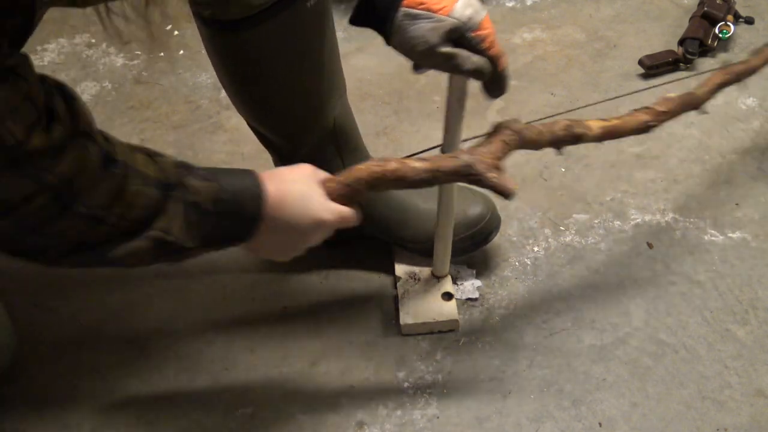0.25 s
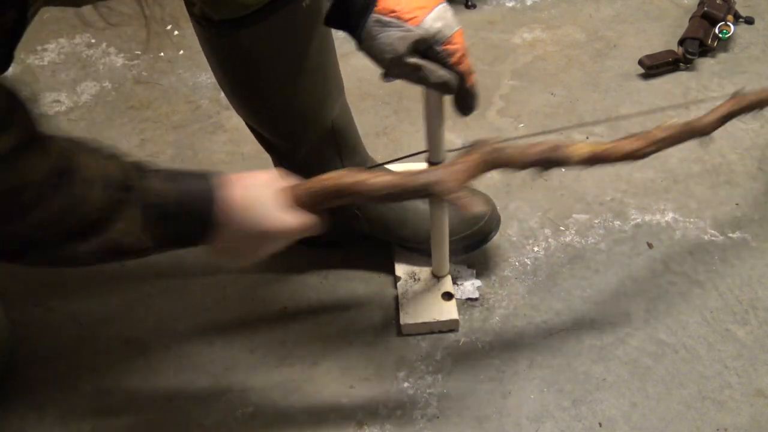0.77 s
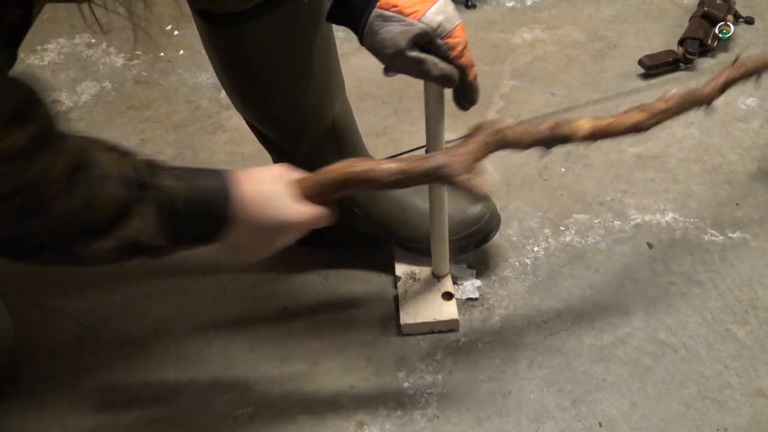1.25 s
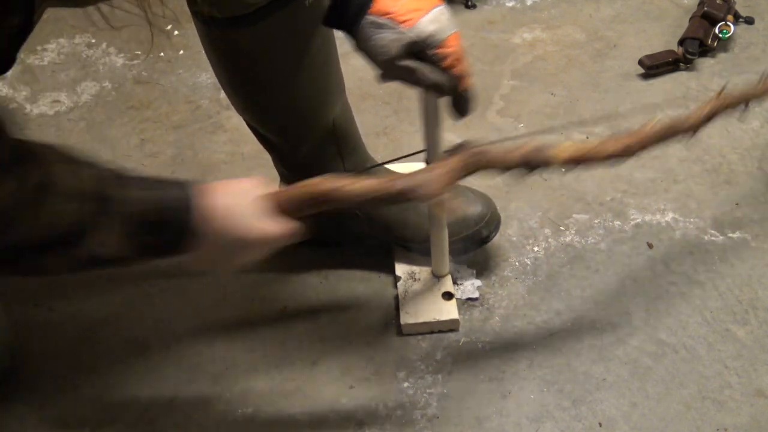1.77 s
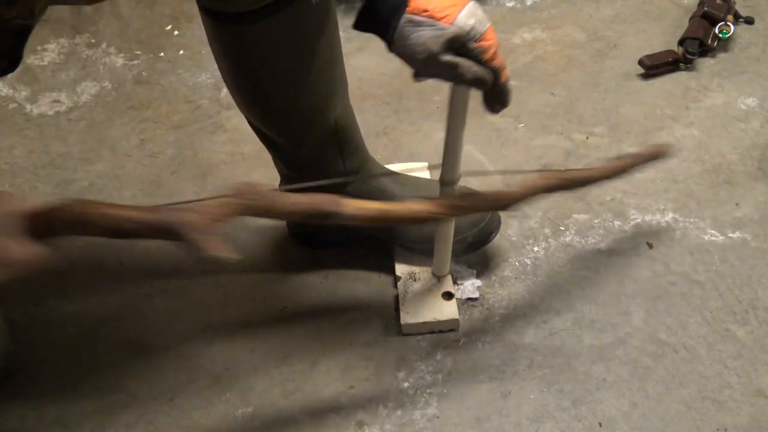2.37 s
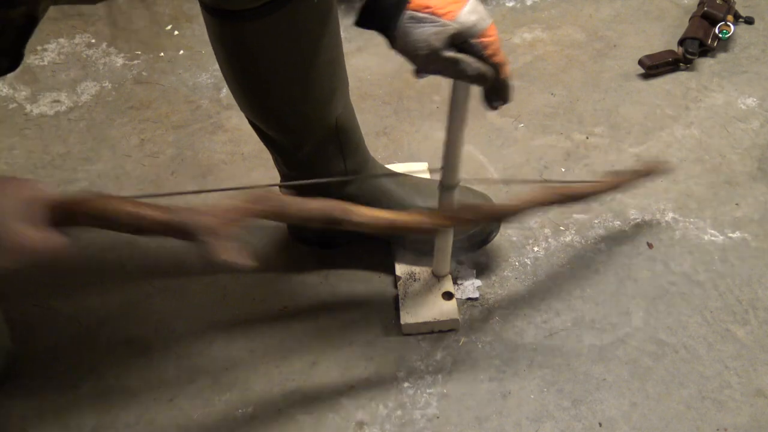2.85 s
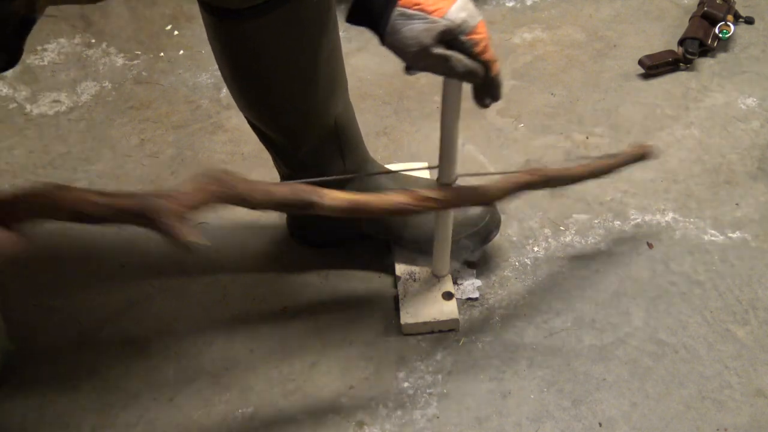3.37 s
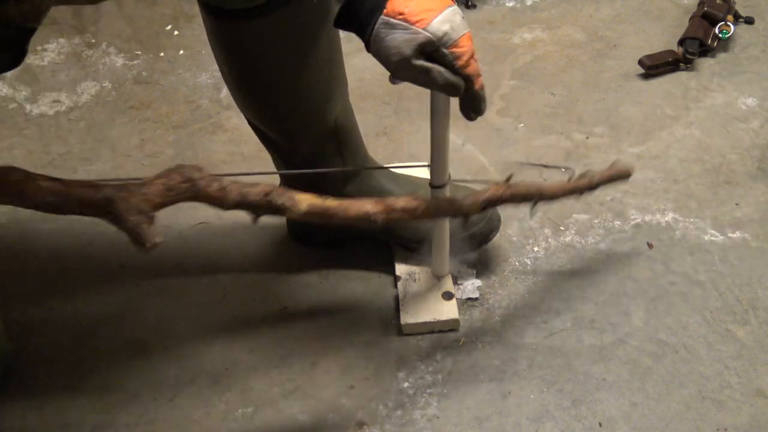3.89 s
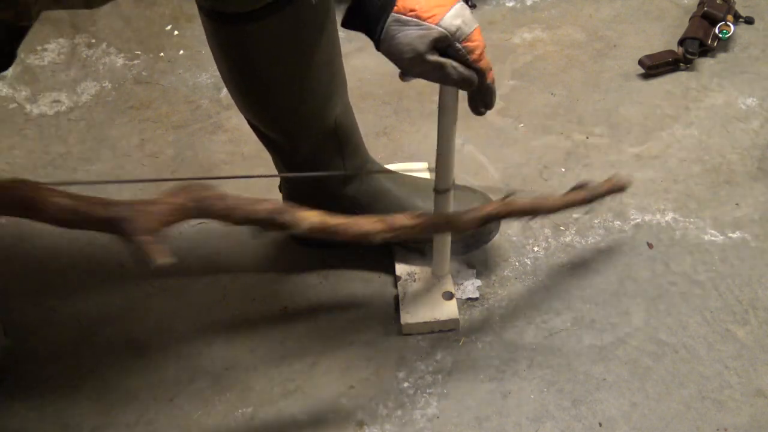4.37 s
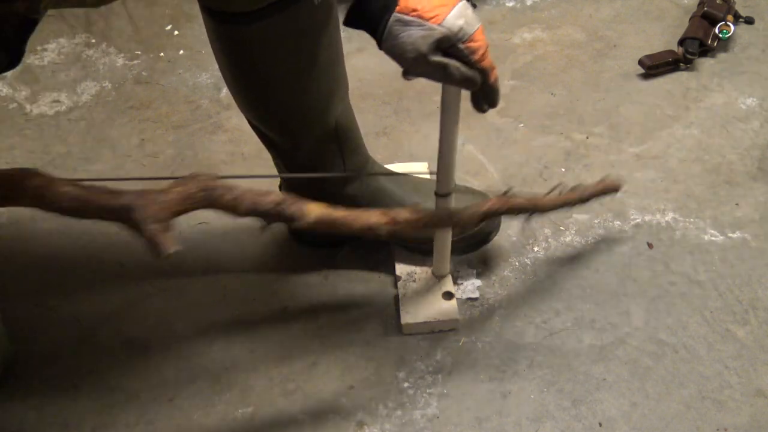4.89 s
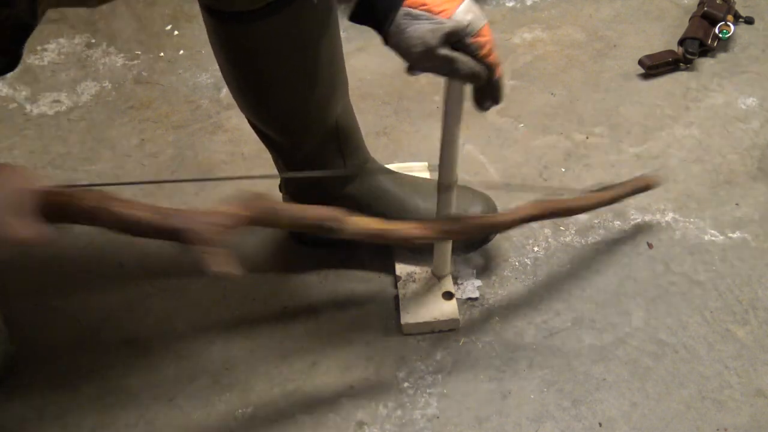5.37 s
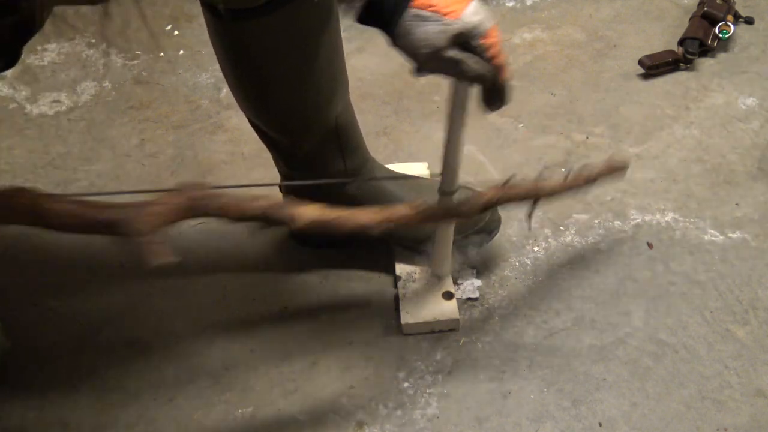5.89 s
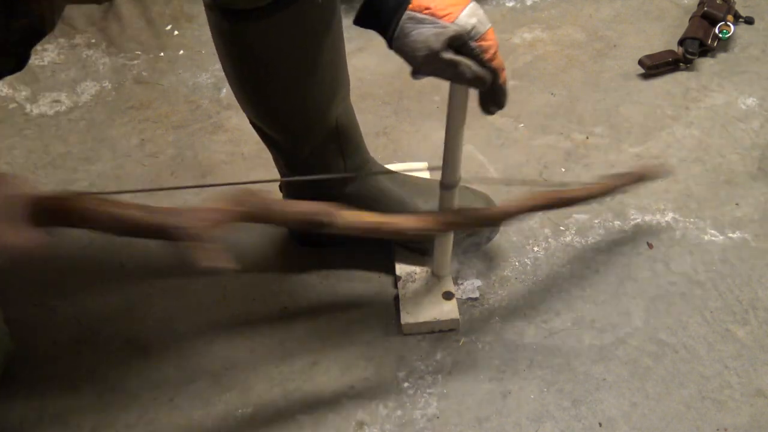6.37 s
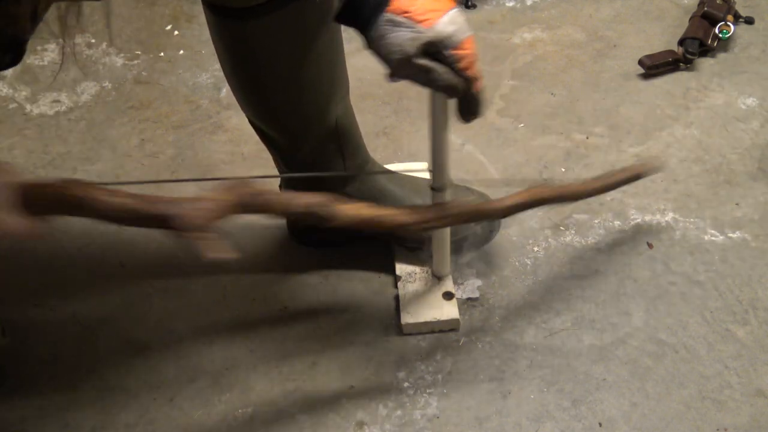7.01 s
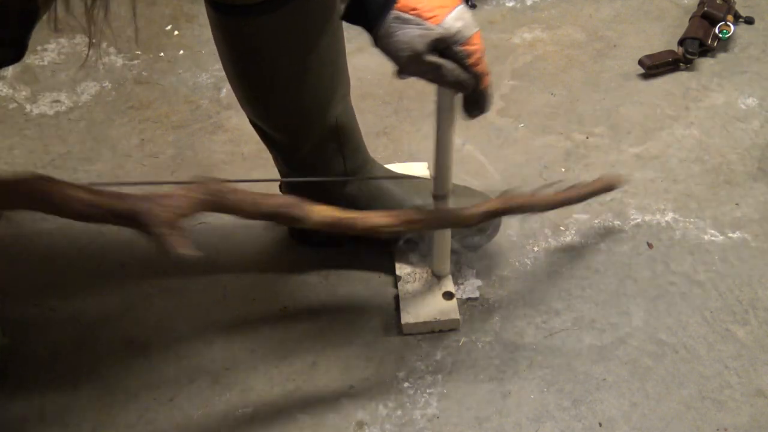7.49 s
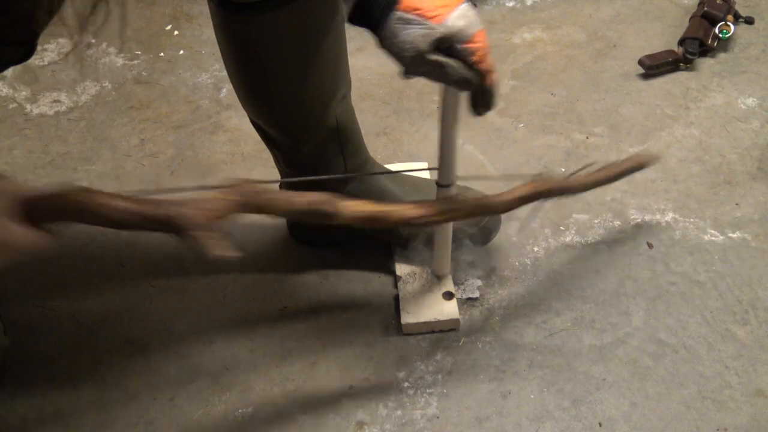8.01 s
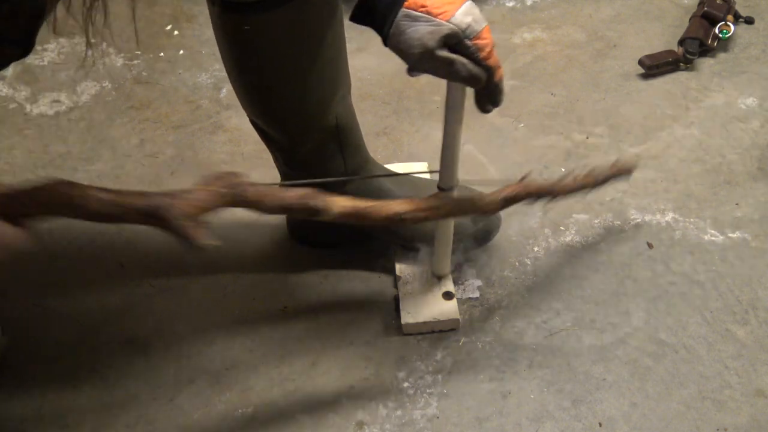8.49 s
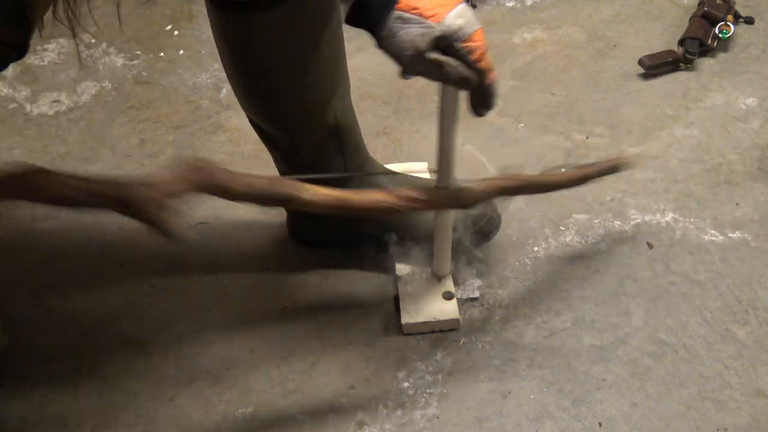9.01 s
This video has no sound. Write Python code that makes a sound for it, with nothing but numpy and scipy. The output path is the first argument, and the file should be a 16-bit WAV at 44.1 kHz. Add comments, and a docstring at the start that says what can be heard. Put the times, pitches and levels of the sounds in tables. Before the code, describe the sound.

A bow drill runs at a steady pace, about two round trips a second, heard close in stereo in a bare, hard room. From 0 to 2 s, high whistling chirps near 2.9 kHz on the pulls alternate with bright, nasal squeals near 1 kHz on the pushes from about 0.7 s, each about a tenth of a second and ringing for under half a second. Around 2.7 s the push gives only a weak, pure squeak. From 3 s the squeals return louder, while the pulls become mostly dry, gritty rasping with high hiss, strongest near 4 s, when a soft falling swish passes. The squeal at 5.7 s is weak; from 6.2 s they are loud and hoarse again, with heavier rasping toward 8.4 s and a longer, lower, rough squeal near 9.2 s. Small board thumps accompany the grabs; sparse faint ticks.

```python
"""Bow drill squealing in a bare room

A bow spins a wooden spindle in a hearth board on a concrete floor, about two round trips a second.
On most pushes the tip sticks and slips in a loud squeal, made of a wandering tone and its overtones.
The pull whistles at first, then mostly rasps (shaped noise) as dust builds up.
A dense noise tail makes the room ring after each squeal, and a limiter holds the peaks down."""
import sys
import numpy as np
from scipy import signal
from scipy.fft import rfft, irfft, next_fast_len
from scipy.io import wavfile
from scipy.ndimage import uniform_filter1d, minimum_filter1d, map_coordinates

SR = 44100
rng = np.random.default_rng(int(sys.argv[2]) if len(sys.argv) > 2 else 0)


def wrap_up_sound(samples):
    """Save the sound to the file named by the first command line argument, as 16-bit audio."""
    columns = np.atleast_2d(samples).T
    # keep every value between -1 and 1, then stretch to whole-number steps
    tamed = np.clip(columns, -1, 1)
    steps = np.round(tamed * 32767).astype(np.int16)
    wavfile.write(sys.argv[1], SR, steps)


N = 407925  # length in samples

# Levels in the tables and settings are relative: grip, friction and the final mix act on top of them.
# stick-slip squeals on the pushes:
# (grab t/s, length/s, f/Hz, level/dB, grip = octave over fundamental/dB, roughness 0-1)
SQUEALS = [(0.712, 0.079, 1045, -15.5, 4, 0.21), (1.19, 0.091, 1065, -15.5, 3.3, .46),
           (1.7, .072, 1084, -15.5, 3.5, 0.66), (2.184, .095, 1069, -16, 3.3, .34),
           (2.712, .042, 1182, -23, -21, 0.24), (3.183, 0.083, 1110, -12, 1, 0.31),
           (3.658, 0.084, 1045, -10, 2.5, 0.51), (4.145, 0.082, 1108, -10.5, 3.3, .35),
           (4.638, 0.1, 1062, -12.5, 3.2, .4), (5.185, 0.057, 1117, -9.2, -2.3, .28),
           (5.721, 0.03, 1174, -18.5, -16.5, 0.15), (6.192, .105, 1125, -8.5, 2.2, .26),
           (6.671, .1, 1056, -8.5, 3.5, .38), (7.168, .11, 1043, -10.5, 5, .44),
           (7.677, 0.089, 1069, -12, -2, .34), (8.203, .07, 1035, -10, -2.2, 0.4),
           (8.672, .11, 1106, -10, 3.3, .28), (9.169, 0.13, 989, -11, 7, 0.39)]
# overtones of the slip, from the third harmonic up: level/dB
SQUEAL_OVERTONES = [-13, -10.5, -21.5, -25.5, -34, -33.5, -48, -48, -58, -60]
# how far the bite pulls the pitch from FREE_HZ to the squeal's own:
# (share of the squeal's length, bite; 1 = the squeal's own pitch)
BITE = [(-.45, 0), (-.1, .4), (.08, 1.1), (.3, 1.17), (.65, .92), (1.1, 1.17)]
# the hard fresh tip squeals brightly until dust dulls it: (t/s, high overtone level/dB)
DULLING = [(1.8, .5), (3.6, -5.5)]
# short chirps of the spindle's higher modes: (t/s, length/s, f/Hz, level/dB, roughness 0-1)
CHIRPS = [(0, 0.035, 2833, -35, .5), (.213, .052, 3014, -12.5, .27), (.235, .043, 1983, -30.5, .4),
          (.423, .047, 2890, -13.5, .3), (.692, .012, 2012, -24, .24), (.952, .045, 2878, -14, .25),
          (1.181, .022, 1976, -13, 0.41), (1.681, 0.06, 1923, -12, 0.32), (1.923, .012, 2790, -22, .15),
          (1.944, .026, 2871, -16.5, .26), (2.637, .06, 2023, -33, .5), (3.358, 0.025, 1674, -27, 0.58),
          (4.118, 0.021, 1882, -24, .33), (5.138, .034, 1950, -26, .35), (5.377, .016, 1980, -16.5, .48),
          (6.112, .03, 1891, -32, .4), (6.355, .025, 1900, -27, .4), (8.167, .033, 1890, -14, 0.67)]
# overtones of a chirp, from the octave up: level/dB
CHIRP_OVERTONES = [-9.5, -22.5, -38]
# thin singing as each push gathers speed: (f/Hz, level/dB, delay after the bow reverses/s)
SINGING_MODES = [(1240, -46, 0.0864), (1980, -37.5, 0.074), (3060, -48, 0.049), (4786, -41.5, .04)]
# the board jolted against the floor: (f/Hz, level/dB, time to the peak/s)
JOLT = [(75, -51, 0.0087), (170, -51, .005), (326, -49, 0.0033)]
# colour of the low grinding, dry wood on wood: (f/Hz, level per Hz/dB)
GRIND_COLOUR = [(18, -45), (30, -10), (80, 2), (220, -1), (330, 2.5), (430, 1.5), (590, 1), (663, -3),
                (864, 5), (1000, -3.5), (1300, -34), (2200, -120)]
# colour of the high hiss of the same rubbing: (f/Hz, level per Hz/dB)
HISS_COLOUR = [(530, -81), (900, -41), (967, -22), (1170, 5), (1370, -8), (1600, 1), (2400, -2), (2670, 4),
               (3390, -6), (4410, 3), (4960, -4), (6150, -4), (6930, -9.5), (8200, -9.5), (11000, -19),
               (15600, -30.5)]
# friction grows as dust builds up and the hand bears down: (t/s, level/dB)
FRICTION = [(0, 2.5), (.6, .8), (2.3, 2.3), (3.2, 4.7), (4, 8.3), (4.6, 6.3), (5.4, 6), (5.9, 9),
            (6.4, 10.2), (6.9, 7), (7.4, 6), (8.4, 10.5), (9.2, 8)]
# the arm's pace: (t/s, length of a round trip/s)
PACE = [(3.5, .487), (4, 0.5245), (6, .499)]
# light dry ticks: (t/s, level/dB)
TICKS = [(0.247, -29), (1.642, -42), (2.772, -37), (5.782, -35), (9.015, -31)]
# how long the room rings: (f/Hz, time to fall by 60 dB/s)
ROOM_RING = [(150, 0.14), (1000, 0.45), (3000, 0.49), (6000, 0.41), (14000, 0.34)]
# colour of the still air of the room: (f/Hz, level per Hz/dB)
AIR_COLOUR = [(25, -16), (80, 0.5), (300, -6.5), (1000, -22), (5000, -18.5), (10000, -28), (15000, -40)]
# tilt of the microphone pair: (f/Hz, left minus right/dB)
LEAN = [(60, -2), (110, -1), (200, 0), (380, 2.5), (700, 0.5), (1290, 0.5), (2380, -2), (4400, -0.5),
        (8120, -0.5), (15000, 0.5)]
# how unlike the two microphones are: (f/Hz, unrelated share/dB)
WIDTH = [(60, -15), (300, -14.5), (1000, -24), (2500, -29), (4000, -28), (7000, -11), (12000, -23.5)]

# the bow's rhythm: start of a push (s), and the share of a round trip that the push takes
FIRST_PUSH_S, PUSH_SHARE = -.376, .508
FREE_HZ = 1241  # the tip's pitch before it grabs
MODE_HZ, MODE_WIDTH_HZ, MODE_DB = 2950, 170, 8  # the spindle's resonance lifts overtones that fall near it
EDGE_PER_GRIP = 1.49  # dB of high overtones per dB of grip
CHIRP_SAG, CHIRP_SAG_S = .015, .005  # a chirp starts sharp by this share and settles as it catches
SINGING_GROWS = .78  # dB per dB of friction
# a faint hoarse note on each pull: pitch, its spread from pull to pull (share), level, delay and length
PULL_HZ, PULL_SPREAD, PULL_DB, PULL_DELAY_S, PULL_LENGTH_S = 1690, .04, -46, .055, .05
HISS_DB, GRIND_DB = -56.8, -52.7  # at full speed, before friction is added
GRIND_GROWS, PULL_GRINDS = 1.1, .65  # dB of grinding per dB of friction, and the extra on a pull
EAGER = .03  # the top speed comes about this share of a stroke before its middle
SPEED_DB, TURNS_PER_S = 14, 35  # rise from rest to full speed; the spindle's top speed
# one low swish, falling in pitch
SWISH_S, SWISH_LENGTH_S, SWISH_DB = 4.0, .165, -37.5
SWISH_FROM_HZ, SWISH_TO_HZ, SWISH_WIDTH_HZ = 950, 280, 580
TOP_HZ = 15780  # nothing is kept above this


def squeals():
    """The tip sings as a near sine, then locks into stick-slip: the pitch sags and overtones burst in."""
    out, lead = np.zeros(N), .1
    t = np.arange(SR // 3) / SR - lead  # 0 = the grab
    for s, length, hz, db, grip_db, rough in SQUEALS:
        bright_db = EDGE_PER_GRIP * grip_db + at(DULLING, s)
        pitch = FREE_HZ + (hz - FREE_HZ) * at(BITE, t / length)
        phase = slip_phase(pitch, rough, drift=0.0617, jitter=0.044)
        depth = .3 + .8 * rough
        # a smooth squeal builds up slowly, a rough one catches at once
        swell = gate(t + 0.0029, length, rise=0.025 * np.exp(-2 * rough), fall=0.014)
        tone = swell * shudder(t, depth) * np.sin(phase)
        octave_swell = gate(t, length * 0.79, rise=0.0046, fall=0.02)
        tone += amp(grip_db - 1.5) * octave_swell * shudder(t, depth) * np.sin(2 * phase)
        # a sharper slip lifts the high overtones most
        edge = 0
        for k, level in enumerate(SQUEAL_OVERTONES, 3):
            lift_db = MODE_DB / (1 + ((k * hz - MODE_HZ) / MODE_WIDTH_HZ) ** 2)
            gain = amp(level + bright_db * k / 4 + lift_db)
            edge = edge + gain * shudder(t, rough) * np.sin(k * phase)
        # each slip throws off a puff of scraping noise and a little fizz
        noise = rng.standard_normal(len(t))
        band = signal.butter(2, [2600, 5200], "bandpass", fs=SR, output="sos")
        fibres = amp(bright_db + 0.5) * rough ** 2 * signal.sosfilt(band, noise)
        fizz = amp(2 * grip_db - 42.5) * noise
        scrape = (fibres + fizz) * (1 + np.cos(phase))
        # the first slips after the grab are the harshest
        harsh = gate(t - .003, length * 1.032, rise=0.00044, fall=0.015)
        harsh = harsh * amp(3.9 * np.exp(-np.abs(t) / 0.028))
        add(out, s - lead, amp(db - 2.5) * (tone + harsh * (edge + scrape)))
    return out


def chirps():
    """A higher spindle mode catches briefly and sags; stronger chirps slip more and gain overtones."""
    out, lead = np.zeros(N), .05
    t = np.arange(SR // 4) / SR - lead
    for s, length, hz, db, rough in CHIRPS:
        pitch = hz * (1 + CHIRP_SAG * np.exp(-np.maximum(t, 0) / CHIRP_SAG_S))
        phase = slip_phase(pitch, rough, drift=0.0722, jitter=0.0614)
        overtones = sum(amp(level) * np.sin(k * phase) for k, level in enumerate(CHIRP_OVERTONES, 2))
        swell = gate(t, length, rise=0.0056, fall=0.0068) * shudder(t, depth=0.69)
        slipping = amp(db / 2) * gate(t - .003, length * 1.07, rise=.0015, fall=0.0028)
        add(out, s - lead, amp(db + 2.5) * (swell * np.sin(phase) + slipping * overtones))
    return out


def singing():
    """The slowly turning tip excites its modes faintly: on a push until it grabs, on a pull for a moment."""
    out, t = np.zeros(N), np.arange(SR // 3) / SR
    turns = reversals()
    pushes, pulls = turns[::2], turns[1::2]
    for grab, *_ in SQUEALS:
        s = pushes[pushes < grab][-1]
        for hz, db, delay in SINGING_MODES:
            falling_hz = hz * (1 - 0.152 * (t - delay))
            phase = slip_phase(falling_hz, 0.5, drift=0.0374, jitter=0.072)
            swell = gate(t - delay, grab - s - delay, rise=0.009, fall=0.004) * shudder(t, depth=1.45)
            add(out, s, amp(db + SINGING_GROWS * at(FRICTION, s)) * swell * np.sin(phase))
    for s in pulls:
        hz = PULL_HZ * (1 + PULL_SPREAD * rng.uniform(-0.984, 1))
        phase = slip_phase(np.full(len(t), hz), .6, drift=.073, jitter=0.062)
        swell = gate(t - PULL_DELAY_S, PULL_LENGTH_S, rise=0.0066, fall=0.0054) * shudder(t, depth=1.0)
        add(out, s, amp(PULL_DB + at(FRICTION, s)) * swell * np.sin(phase))
    return out


def rasp():
    """The tip grinds in its socket; each stroke speeds up from rest and slows again, pulls grind harder."""
    t, turns = np.arange(N) / SR, reversals()
    stroke, along_it = np.divmod(np.interp(t, turns, np.arange(len(turns))), 1)
    # positive on a push, negative on a pull
    swing = np.sin(np.pi * (stroke + along_it + EAGER * np.sin(np.pi * along_it)))
    speed, pulling = np.abs(swing), np.maximum(-swing, 0)
    turn = np.sin(2 * np.pi * np.cumsum(TURNS_PER_S * speed) / SR)
    friction_db = at(FRICTION, t)
    speed_db = SPEED_DB * (speed - 1)
    flutter_db = 0.53 * wobble(35, N)
    grind_growth = GRIND_GROWS + PULL_GRINDS * pulling
    grind_db = GRIND_DB + grind_growth * friction_db + speed_db + 2.7 * flutter_db
    hiss_db = HISS_DB + friction_db + speed_db + flutter_db
    grind = rubbing(grind_db, GRIND_COLOUR, (120, 700), grain_db=.8, turn=0.5 * turn)
    hiss = rubbing(hiss_db, HISS_COLOUR, (9800, 15000), grain_db=1.5, turn=0.66 * turn)
    return grind + hiss


def rubbing(level_db, spectrum, band, grain_db, turn):
    """Crushed fibres: spiky noise throbs with each spindle turn; level_db is set within band (Hz)."""
    grains = rng.standard_normal(N) * amp(grain_db * wobble(900, N) + turn)
    sound = unit(filtered(grains, lambda hz: amp(along(spectrum, hz))))
    inside = filtered(sound, lambda hz: (hz > band[0]) & (hz < band[1]))
    return amp(level_db) * sound / np.std(inside)


def thumps():
    """The sudden grab jolts the board against the floor, harder with a firmer grip."""
    out, t = np.zeros(N), np.arange(SR // 5) / SR
    for s, _, _, _, grip_db, _ in SQUEALS:
        for hz, db, peak_s in JOLT:
            swell = t / peak_s * np.exp(1 - t / peak_s)
            varied_hz = hz * rng.uniform(.8, 1.14)
            add(out, s - .008, amp(db + grip_db) * swell * np.sin(2 * np.pi * varied_hz * t))
    return out


def swish():
    """A brushing sound: a wide band of noise swells and fades while its centre slides down."""
    u = np.linspace(0, 1, round(SWISH_LENGTH_S * SR))
    centre_hz = SWISH_FROM_HZ + (SWISH_TO_HZ - SWISH_FROM_HZ) * u
    phase = 2 * np.pi * np.cumsum(centre_hz) / SR
    band = wobble(SWISH_WIDTH_HZ, len(u)) * np.sin(phase)
    band += wobble(SWISH_WIDTH_HZ, len(u)) * np.cos(phase)
    out = np.zeros(N)
    add(out, SWISH_S, amp(SWISH_DB) * np.sin(np.pi * u) * band)
    return out


def ticks():
    """Tiny bright clicks: bursts of noise that die within milliseconds."""
    out, t = np.zeros(N), np.arange(SR // 20) / SR
    for s, db in TICKS:
        add(out, s, amp(db - 3.5) * np.exp(-t / 0.0014) * rng.standard_normal(len(t)))
    return out


def room(x):
    """Hard walls answer with a dense tail, each frequency dying at its own speed."""
    hz, t, z = signal.stft(rng.standard_normal(SR * 3 // 4), SR, nperseg=256)
    fading = z * amp(-60 * t / along(ROOM_RING, hz)[:, None])
    tail = signal.istft(fading, SR, nperseg=256)[1]
    tail = tail * (1 - np.exp(-np.arange(len(tail)) / SR / 0.0017))  # soft start
    return signal.fftconvolve(x, tail / np.linalg.norm(tail))[:N]


def air():
    """A faint steady background of coloured noise."""
    return amp(-59.5) * unit(filtered(rng.standard_normal(N), lambda hz: amp(along(AIR_COLOUR, hz))))


def reversals():
    """Times at which the bow turns round, starting a push and a pull in turn."""
    times, s = [], FIRST_PUSH_S
    while s < N / SR + 1:
        trip = at(PACE, s)
        times += [s, s + PUSH_SHARE * trip]
        s += trip
    return np.array(times)


def slip_phase(hz, rough, drift=0.0362, jitter=0.09):
    """Phase of a friction oscillation whose period wanders and jitters on the wood's grain."""
    scatter = drift * wobble(149.88, len(hz)) + jitter * wobble(900, len(hz))
    return 2 * np.pi * np.cumsum(hz * (1 + rough * scatter)) / SR


def gate(t, length, rise, fall):
    """Self-excited vibration: grows exponentially up to t = 0, holds, then dies away."""
    return np.exp(np.minimum(t, 0) / rise - np.maximum(t - length, 0) / fall)


def shudder(t, depth):
    """Uneven contact makes a vibration flutter within milliseconds; mean power stays near 1."""
    return (1 + depth * wobble(230, len(t))) / np.sqrt(1 + depth ** 2)


def wobble(rate, size):
    """A smooth random curve through rate random points a second."""
    knots = rng.standard_normal(size // 8)
    return map_coordinates(knots, [np.arange(size) * rate / SR], mode="wrap")


def amp(db):
    """Decibels to gain."""
    return 10 ** (np.asarray(db) / 20)


def unit(x):
    """Scale to an rms (average strength) of 1."""
    return x / np.sqrt(np.mean(x ** 2) + 1e-20)


def at(curve, s):
    """Value of a (t/s, value) curve at time s."""
    return np.interp(s, *np.transpose(curve))


def along(points, hz):
    """Value of a (f/Hz, value) curve at hz, read on a log axis."""
    f, v = np.transpose(points)
    return np.interp(np.log(hz + 1), np.log(f + 1), v)


def filtered(x, response):
    """Multiply the spectrum of x by a response of frequency."""
    m = next_fast_len(N + SR // 2)
    return irfft(rfft(x, m) * response(np.fft.rfftfreq(m, 1 / SR)), m)[..., :N]


def add(track, s, sound):
    """Lay a sound into the track at time s, cutting what falls outside."""
    start = round(s * SR)
    a, b = max(start, 0), min(start + len(sound), N)
    if a < b:
        track[a:b] += sound[a - start:b - start]


def scene():
    """Drill and room reach two closely spaced microphones almost alike."""
    tones = squeals() + chirps() + singing() + thumps() + ticks() + swish()
    rub = rasp()
    echo = room(tones + amp(-16.5) * rub)
    mid = amp(0.5) * tones + amp(1.5) * echo + amp(-3.0) * rub + air()
    side = filtered(room(mid), lambda hz: amp(along(WIDTH, hz)))
    pair = np.array([mid + side, mid - side])
    # half of the lean goes to each side
    return filtered(pair, lambda hz: amp(np.outer([.5, -.5], along(LEAN, hz))))


def limiter(x, ceiling_db, release_db_per_s):
    """Gain ducks within about a millisecond around a peak and recovers at a steady rate."""
    over_db = np.maximum(20 * np.log10(np.abs(x).max(axis=0) + 1e-9) - ceiling_db, 0)
    recovery = release_db_per_s * np.arange(N) / SR
    cut_db = np.maximum.accumulate(over_db + recovery) - recovery
    return x * amp(uniform_filter1d(minimum_filter1d(-cut_db, size=45), size=45))


def record(dry):
    """Limit the peaks, then cut everything above the band limit."""
    limited = limiter(dry, ceiling_db=-3.0, release_db_per_s=49.0)
    return filtered(limited, lambda hz: hz < TOP_HZ)


dry = scene()
out = record(dry)
wrap_up_sound(out)
```